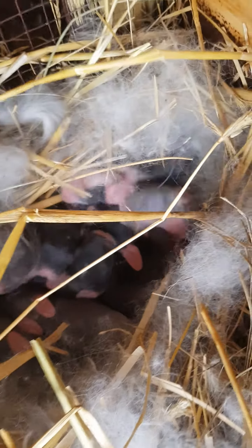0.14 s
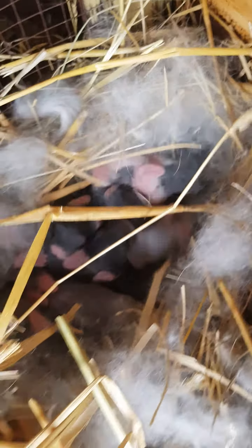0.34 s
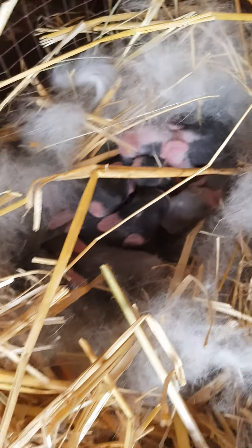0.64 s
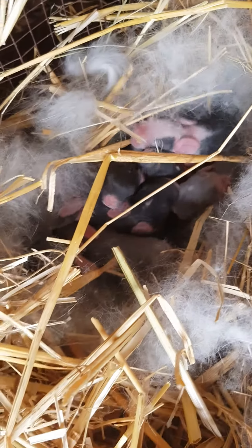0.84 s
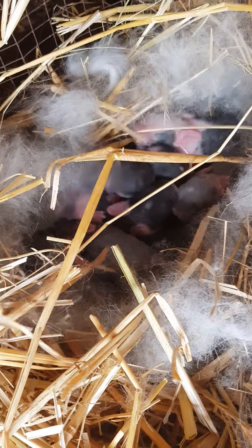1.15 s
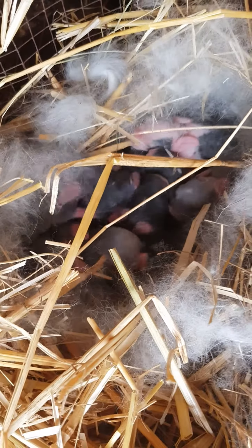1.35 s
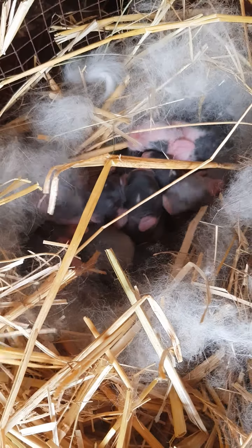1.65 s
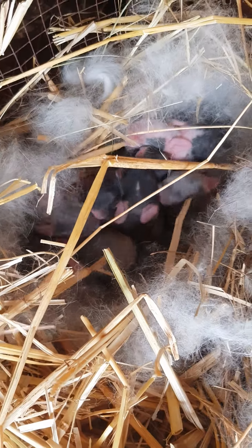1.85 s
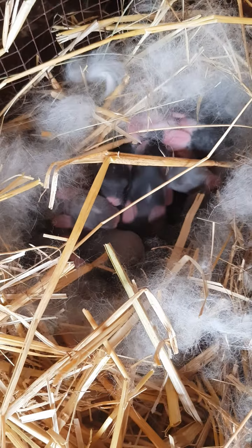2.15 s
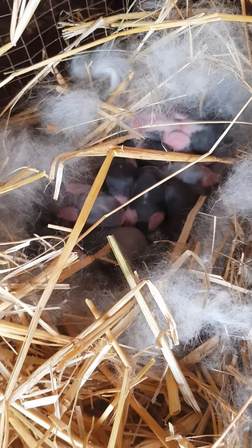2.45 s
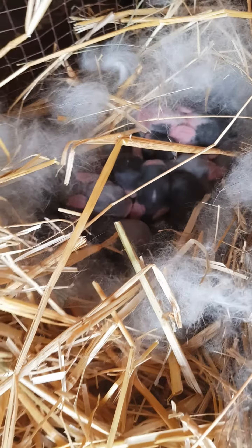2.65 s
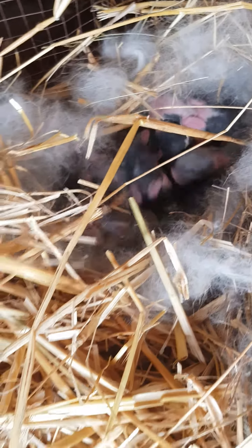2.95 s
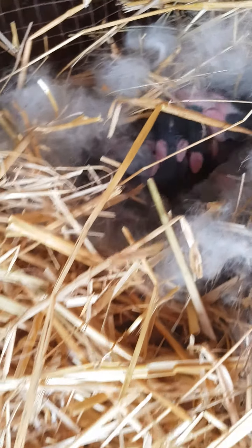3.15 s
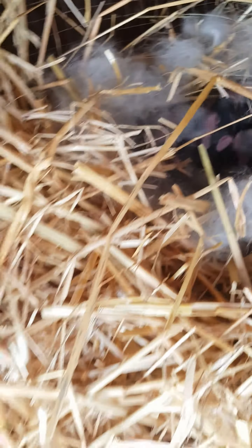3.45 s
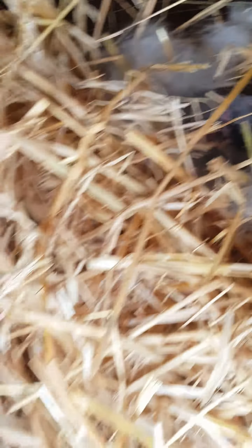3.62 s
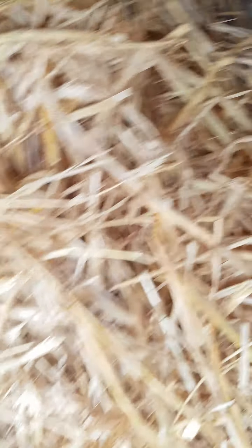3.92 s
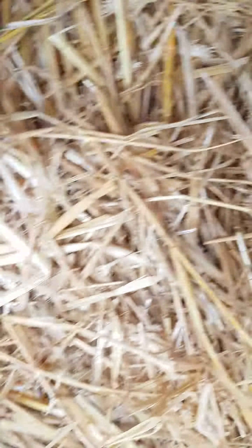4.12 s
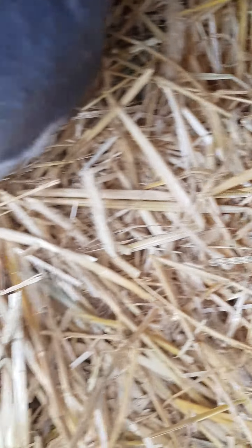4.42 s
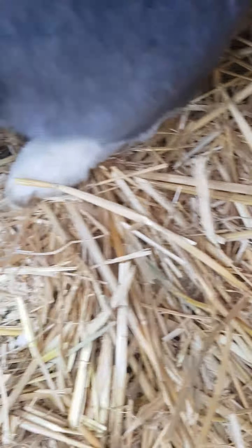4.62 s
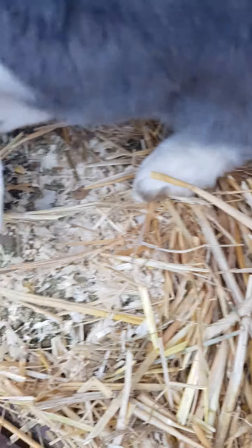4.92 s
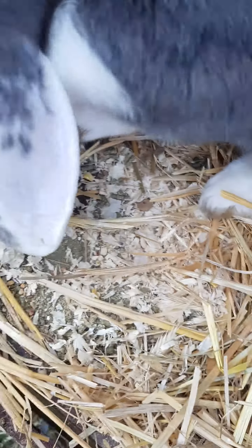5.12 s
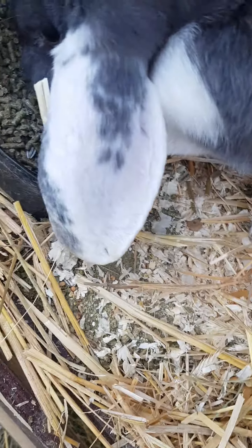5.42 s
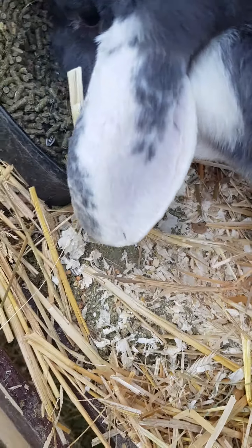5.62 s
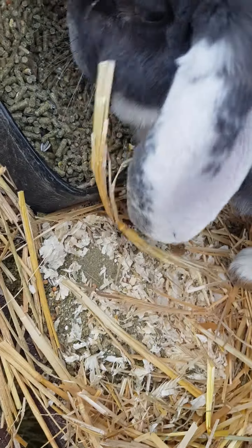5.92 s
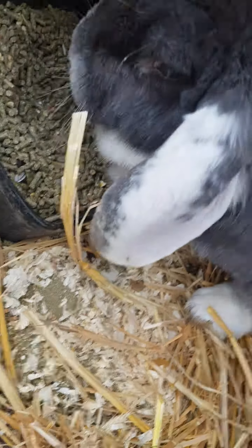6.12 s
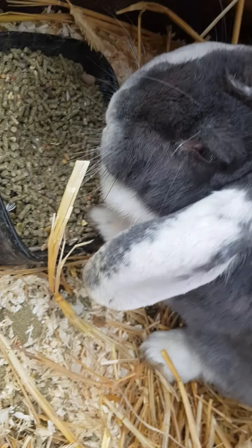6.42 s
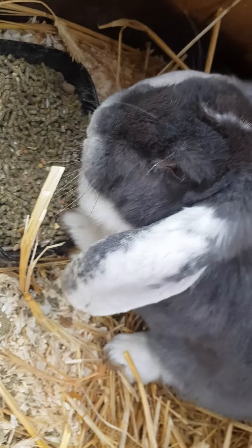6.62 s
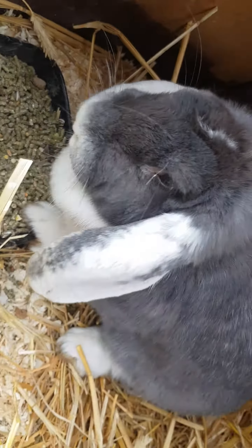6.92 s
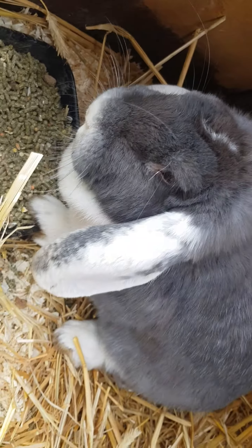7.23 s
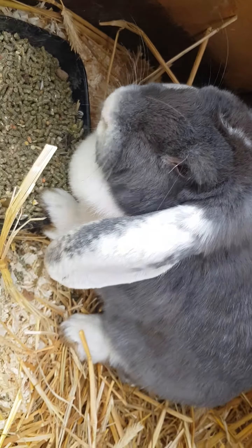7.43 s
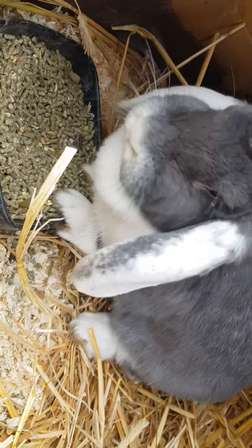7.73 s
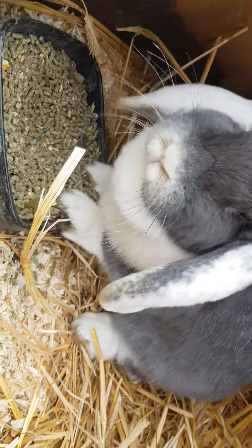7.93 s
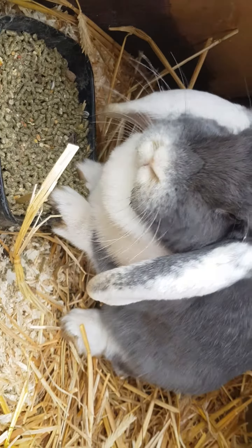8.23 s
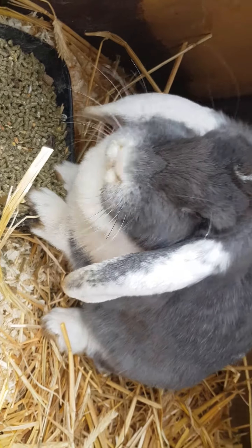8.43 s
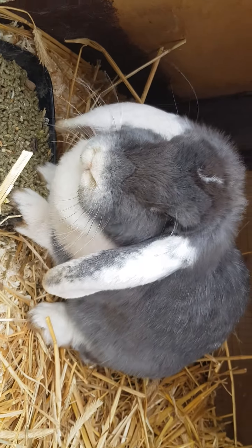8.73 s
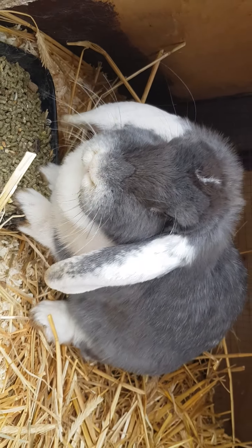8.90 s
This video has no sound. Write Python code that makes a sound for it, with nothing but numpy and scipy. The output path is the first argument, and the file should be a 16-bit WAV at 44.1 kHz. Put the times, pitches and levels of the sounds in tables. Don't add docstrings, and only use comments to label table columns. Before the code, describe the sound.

Outdoors at a rabbit hutch, a farther hen gives three quick chirps, four clucks and a brief thin whine. Dry straw rustles, ticks and snaps close to the microphone, with soft hollow knocks and a wire creak as the stirring peaks. A nearer hen then lets out a long yodelling drawl with a breaking voice and five clucks, leaving faint straw and knocks over low rumble.

```python
import sys
import numpy as np
from scipy import signal
from scipy.fft import rfft, irfft
from scipy.io import wavfile
from scipy.ndimage import uniform_filter1d

SR = 44100
rng = np.random.default_rng(int(sys.argv[2]) if len(sys.argv) > 2 else 0)


def voltage_ratio(level):
    return 10 ** (np.asarray(level, float) / 20)


def digitize_waveform(pressure):
    field = np.atleast_2d(pressure).T
    bounded = np.clip(field, -1, 1)
    quanta = np.round(bounded * 32767).astype(np.int16)
    wavfile.write(sys.argv[1], SR, quanta)


N = 399546

# (time [s], pitch [Hz], first partial [dB], second partial [dB])
DRAWL = [
    (5.25, 511.2, -49.5, -51),
    (5.34, 613, -43.5, -66),
    (5.41, 587, -37.5, -59),
    (5.52, 631, -38, -54.5),
    (5.7, 623, -39, -49),
    (5.905, 626.5, -34.5, -36),
    (6.095, 637.5, -37, -41.5),
    (6.115, 659.4, -35.5, -35),
    (6.352, 676.6, -34, -30),
]
# (start [s], length [s], pitch [Hz], first partial [dB], second partial [dB])
NEAR_CLUCKS = [
    (6.486, 0.21, 645, -37, -34),
    (6.818, .19, 611.7, -37, -34.5),
    (7.144, 0.17, 598, -36.5, -33.5),
]
LATE_CLUCKS = [
    (7.451, 0.17, 592.3, -37, -29),
    (7.772, 0.192, 608, -39.5, -30),
]
FAR_CHIRPS = [
    (0, 0.059, 874, -43.5, -48),
    (.146, 0.071, 651, -41, -53),
    (.268, 0.057, 731, -42.5, -42),
]
FAR_CLUCKS = [
    (.447, 0.15, 622, -44.5, -60.5),
    (.7, .17, 671, -44, -64.5),
    (1.01, 0.174, 662.6, -44, -65.5),
    (1.39, .22, 665, -42.5, -59),
]
# (time [s], pitch [Hz], first partial [dB], second partial [dB])
WHINE = [
    (1.925, 600, -77, -52),
    (1.96, 624.5, -68, -47.5),
    (2.05, 648, -69, -46),
    (2.13, 636, -67, -44),
    (2.205, 598, -50, -47.5),
    (2.23, 582, -52, -39.5),
    (2.285, 562, -57, -48),
]
# (share of length [0-1], pitch [ratio], first partial [dB], second partial [dB],
# half lines against the first partial [dB]); the late one throbs twice and fades
NEAR_SHAPE = [(0, .925, -2.5, -5, -31), (.13, 1.015, 1.5, 0.5, -21), (.38, .985, -2, 0, -20),
              (.7, 1.015, 0.5, 1, -21), (0.999, 1.005, -0.5, 6, -13)]
LATE_SHAPE = [(0, .925, -1.5, -6, -14), (.13, 1.015, 1, -2, -19), (.38, .985, -1.5, -2, -15),
              (.55, 1.001, -1.5, -5.5, -20), (.78, 1.02, 0, 2.5, -13.5), (1, 1.005, -4.5, -7, -25)]
FAR_SHAPE = [(0, .92, -8.5, 8, -6), (.14, 0.99, -4, 7, -11), (.55, 1.01, -0.5, 3.5, -14.5),
             (1, 1.05, -2.5, 9, -11)]
CHIRP_SHAPE = [(0, 1.08, -2, -4.5, -34), (.5, 1.001, -1.5, 0, -19), (1, 1.06, -7, -8, -13)]
# (middle [s], length [s], pitch jump [Hz], level change [dB])
VOICE_BREAKS = [(0.464, 0.061, 20.4, -3.5), (0.704, 0.0075, 137, 1.5), (1.009, 0.02, 160, 0.5),
                (5.373, 0.03, 130, -15), (5.429, 0.022, 107, -13), (5.483, 0.014, 53, 0.5),
                (5.54, 0.028, 116, -10), (5.665, 0.019, 95, 1.5), (5.72, 0.014, 86, 2),
                (5.751, 0.019, 70, -1), (5.786, 0.0195, 75.8, -3), (5.828, 0.031, 105, -1),
                (5.872, 0.044, 92, -1.5), (5.936, 0.022, 94.5, -5), (6.027, 0.0181, 82, 1),
                (6.513, 0.0073, 74, -4), (6.627, 0.0046, 49, 0), (6.927, 0.008, 82, -4),
                (7.801, 0.0095, 56, -6.5)]
# (frequency [Hz], level [dB])
NEAR_THROAT = [(1200, -12), (1880, -12), (2500, -28.5), (3250, -31.5), (3950, -30.5), (4600, -45),
               (5600, -74), (6600, -51.5), (8000, -63)]
DRAWL_THROAT = [(1880, -14), (2500, -27), (3200, -37), (3850, -23), (4450, -30), (5200, -56), (8000, -70)]
FAR_THROAT = [(1200, 21), (1600, -4.5), (2000, -13.5), (2250, -54), (3500, -35), (7000, -38)]
WHINE_THROAT = [(1200, -21), (1600, -20.5), (1900, -22), (2350, -22.5), (3000, -39), (7000, -48)]
# (frequency [Hz], left over right [dB], left phase lead [rad])
NEAR_PLACE = [(600, 0.5, -1), (950, 5.5, -0.9), (1310, -8, -2), (1900, -10.5, 1.5), (3800, 6.5, 1)]
FAR_PLACE = [(600, 0.93, 1.1), (1022, -1.1, -2.5), (1320, 0.89, -1.5), (1900, -2.4, -1), (3800, 0.83, 2)]
# (delay [s], level [dB])
ECHOES = [
    (.011, -58.5),
    (.019, -21),
    (.034, -34.5),
    (.052, -29.5),
]

# (time [s], level [dB])
STRAW = [(0.0, -47), (0.5, -68), (.78, -78.5), (1.26, -65.5), (2.62, -76.5), (2.85, -61.5), (3.73, -53.5),
         (4.0, -59.5), (4.15, -70), (4.35, -61), (5.22, -62.5), (5.7, -50.5), (6.1, -65.5), (6.45, -69),
         (7.95, -61.5), (8.42, -77.5), (8.54, -64.5), (9.06, -66)]
# (start [s], length [s], level [dB], top against the rest [dB])
SWEEPS = [(0.051, 0.094, -50, 0.5), (.815, 0.04, -59, 8), (1.14, 0.24, -65, 5), (1.756, 0.037, -59, 3),
          (3.388, 0.016, -40, -6.5), (3.502, 0.11, -50, -25), (3.622, 0.13, -52, 4.5),
          (3.874, 0.016, -58.5, 21), (5.3, 0.13, -51.5, -1.5), (6.198, 0.17, -58, 1.5),
          (1.34, 0.53, -86, 1), (8.9, .12, -59, -15)]
# (time [s], left over right [dB], top against the rest [dB])
STRAW_SIDE = [
    (0.0, -0.5, 6),
    (1.08, 4, 4.5),
    (2.7, -0.5, 5),
    (4.1, -0.5, 2),
    (5.8, -3.5, -0.5),
    (6.2, -0.5, -6),
    (7.6, -1.5, -7.5),
    (7.87, -14, -4),
    (8.4, -6.5, -2.5),
    (9.06, -2, 0),
]
# (frequency [Hz], level per Hz [dB])
RUSTLE = [(1290, 2), (2200, 0), (2940, -1), (3360, -5.5), (3810, -4), (4110, -4), (6780, -1), (7320, -1.5),
          (9000, -25), (11700, -42), (19800, -120)]
RUSTLE_TOP = [(5000, -3), (8500, -8.5), (9020, -6.5), (11800, 2.5), (15100, -0.5), (15900, 5.5), (16200, 3)]
# (time [s], peak [dB])
THIN_TICKS = [(.6249, -42.5), (.8229, -33.5), (1.1669, -36), (1.22, -31.5), (1.611, -37), (1.764, -29),
              (1.847, -35.5), (1.916, -40), (2.598, -47), (2.9254, -36), (3.037, -29), (3.1841, -34),
              (3.858, -38), (4.97, -41), (5.1504, -58), (8.1904, -41)]
DRY_SNAPS = [
    (1.1503, -45),
    (3.2075, -56),
    (3.5295, -20),
    (3.8767, -22.5),
    (3.8914, -45),
    (5.3507, -25.5),
]
THICK_CRACKS = [
    (3.3888, -36),
    (3.404, -34),
    (3.5842, -30),
    (3.9774, -47),
    (4.6033, -32),
    (7.2558, -45),
    (8.2417, -48.5),
    (8.8903, -38),
]
FULL_CRACKS = [
    (.168, -29.5),
    (2.9631, -34),
    (3.2495, -33),
    (3.656, -22),
    (4.214, -50),
    (5.129, -50),
    (5.982, -43),
    (9.0243, -58),
]
# (time [s], peak [dB], ring [Hz])
KNOCKS = [(0.154, -24, 702), (0.21, -37.5, 976), (0.238, -36, 980), (1.239, -43, 305), (1.399, -42, 662),
          (1.444, -31.5, 328), (1.964, -40, 666), (2.319, -41.5, 650), (2.963, -28.5, 384),
          (3.186, -30, 885), (3.243, -34.5, 720), (3.605, -30, 397), (3.663, -39, 447), (3.76, -36, 558),
          (4.601, -38, 318), (8.29, -43.5, 598), (8.338, -40.5, 590), (8.668, -37, 365), (8.719, -37, 300),
          (8.91, -37.5, 567), (8.969, -35.5, 730)]
# (time [s], pitch [Hz], level [dB])
CREAK = [
    (3.48, 1820, -58),
    (3.516, 1836, -41),
    (3.62, 1800, -47),
]

# (time [s], level over rest [dB])
STIRRING = [(0, 8.5), (.5, -7.5), (2.6, 0), (3.61, 23), (3.95, 4), (5.1, 15), (5.3, 18.5), (5.7, 21),
            (6.33, 19.5), (8.5, 0.5), (9.06, 15)]
# (time [s], level [dB])
BREEZE = [
    (0, -42),
    (2.6, -46),
    (3.61, -34.5),
    (4.0, -45.5),
    (8.5, -45),
    (9.06, -46),
]
# (frequency [Hz], level per Hz [dB])
RUMBLE = [(18, -35.5), (30, -17), (38, 4), (54, 1.5), (92, -2), (108, -9), (125, -15.5), (160, -26),
          (280, -120)]
DRONE = [(68, -32), (115, -9), (152, -3), (173, 1), (196, -1.5), (236, -8), (329, -11), (420, -26.5),
         (550, -30.5), (920, -120)]
SHUFFLE = [(250, -3.5), (350, -6.5), (500, -2), (800, -4.5), (1100, -5.5), (1600, -8)]
TRAFFIC = [(410, -29), (700, -5.5), (871, 5), (1130, 8), (1260, 7), (1470, 3), (1600, 3.5), (2400, -4.5),
           (2960, -22), (4500, -72), (5850, -71), (9900, -120)]
# (frequency [Hz], left-right likeness [-1 to 1])
LIKENESS = [(60, 0.95), (150, 1), (380, 0.66), (950, -0.13), (2380, -0.032), (5980, -0.033),
            (15000, 0.0084)]


def rms_one(x):
    return x / np.sqrt(np.mean(x ** 2) + 1e-20)


def in_time(rows):
    s, *columns = np.transpose(rows)
    return [np.interp(np.arange(N) / SR, s, column) for column in columns]


def at_hz(points, hz, order=1):
    points = np.array(points)
    return np.interp(np.log(hz), np.log(points[:, 0]), points[:, order])


def drift(rate, size=N):
    r = np.exp(-16 * np.pi * rate / SR)
    white = rng.standard_normal(size // 8 + 8002)
    slow = signal.lfilter([1], [1, -2 * r, r * r], white)[8000:]
    return np.interp(np.arange(size) / 8, np.arange(len(slow)), rms_one(slow))


def band(x, low_hz, high_hz):
    return signal.sosfilt(signal.butter(2, [low_hz, high_hz], "band", fs=SR, output="sos"), x)


def sides(pan_db):
    return voltage_ratio(np.array([pan_db / 2, -pan_db / 2]))


def coloured(white, spectrum, patchy_db, rate):
    hz = np.maximum(np.fft.rfftfreq(N, 1 / SR), 1)
    alike = np.clip(at_hz(LIKENESS, hz), -.99, .99)
    mid, side = rfft(white) * voltage_ratio(at_hz(spectrum, hz)) * np.sqrt([1 + alike, 1 - alike])
    pair = np.array([mid + side, mid - side])
    low_hz, high_hz = spectrum[0][0], spectrum[-1][0]
    half_octave = np.log2(hz / low_hz) * 2
    out, together = 0, drift(rate / 4)
    for k in range(int(np.log2(high_hz / low_hz) * 2) + 2):
        share = np.clip(1 - np.abs(half_octave - k), 0, 1)
        flicker = voltage_ratio(patchy_db * (1.86 * together + drift(rate)))
        out = out + flicker * irfft(pair * share, N)
    return out / np.sqrt(np.mean(out.mean(axis=0) ** 2))


def hen(calls, throat, place, jitter, shimmer_db, breath_db, tail_s, first_share, half_lift_db, hoarse_db):
    out, (jump, dip) = np.zeros((2, N)), voice_breaks()
    for rows in calls:
        s, pitch, first_db, second_db, half_db = np.transpose(rows)
        at = np.arange(round(s[0] * SR), round((s[-1] + .04) * SR))
        t = at / SR
        hz = np.interp(t, s, pitch) * (1 + jitter * drift(86, size=len(t))) + jump[at]
        phase = 2 * np.pi * np.cumsum(hz) / SR
        attack = np.clip((t - s[0]) / 0.0024, 0, 1) ** 2
        edge = attack * np.exp(-np.maximum(t - s[-1], 0) / tail_s)
        upper_db = first_share * first_db + (1 - first_share) * second_db
        for k in np.arange(1, 10.5, .5):
            half_line = k % 1 > 0
            curve_db = half_db if half_line else {1: first_db, 2: second_db}.get(k, upper_db)
            level_db = np.interp(t, s, curve_db)
            if k > 2:
                lift_db = half_lift_db if half_line else 0
                level_db = level_db + at_hz(throat, k * hz) + lift_db - 0.065 * jump[at]
            level_db = level_db + dip[at] + shimmer_db * np.sqrt(k) * drift(36, size=len(t))
            breath = drift(400, size=len(t)) + 1j * drift(400, size=len(t))
            rasp = voltage_ratio(min(breath_db + hoarse_db * (k - 1), -1.5)) * breath
            wave = np.exp(1j * (k * phase + rng.uniform(0, 6.2)))
            tone = np.sqrt(2) * voltage_ratio(level_db) * edge * (1 + rasp) * wave
            mean_hz = k * pitch.mean()
            lead = at_hz(place, mean_hz, order=2)
            pair = sides(at_hz(place, mean_hz)) * np.exp(.5j * lead * np.array([1, -1]))
            out[:, at] += np.real(pair[:, None] / np.abs(pair.mean()).clip(.3) * tone)
    return out


def voice_breaks():
    jump, dip = np.zeros(N), np.zeros(N)
    ends = [DRAWL[-1][0]] + [s + length for s, length, *_ in NEAR_CLUCKS + LATE_CLUCKS]
    last_flips = [(end + .003, .02, 85, -4) for end in ends]
    for s, length, jump_hz, dip_db in VOICE_BREAKS + last_flips:
        t = np.arange(max(round((s - .05) * SR), 0), round((s + .05) * SR))
        shape = 1 / (1 + np.exp((np.abs(t / SR - s) - length / 2) / 0.0012))
        jump[t] += jump_hz * shape
        dip[t] += dip_db * shape
    return jump, dip


def shaped(calls, shape):
    return [[(s + share * length, hz * ratio, first_db + a_db, second_db + b_db, first_db + half_db)
             for share, ratio, a_db, b_db, half_db in shape]
            for s, length, hz, first_db, second_db in calls]


def long_call(rows, half_db):
    return [[(*row, row[-1] + half_db) for row in rows]]


def yard(x):
    dull, out = band(x[::-1], 300, 1800), x.copy()
    for delay, db in ECHOES:
        lag = round(delay * SR)
        out[:, lag:] += voltage_ratio(db) * dull[:, :-lag]
    return out


def straw():
    t = np.arange(N) / SR
    edge_s = 0.013
    low_power = top_power = voltage_ratio(in_time(STRAW)[0]) ** 2
    for s, length, db, top_db in SWEEPS:
        rise = np.tanh((t - s) / edge_s * 2)
        fall = np.tanh((t - s - length) / edge_s / 2)
        on = (rise - fall).clip(0) / 2
        low_power = low_power + (voltage_ratio(db) * on) ** 2
        top_power = top_power + (voltage_ratio(db + top_db) * on) ** 2
    cracks_per_s = 500 * voltage_ratio(6.0 * np.tanh(drift(20)))
    crack_size = voltage_ratio(1.96 * np.minimum(rng.exponential(1, N), 2.6))
    cracks = crack_size * (rng.random(N) < cracks_per_s / SR)
    burst = 1 + 0.71 * signal.lfilter([1], [1, -.97], cracks)
    low = coloured(burst * rng.standard_normal((2, N)), RUSTLE, patchy_db=1.5, rate=12.1)
    top = coloured(burst * rng.standard_normal((2, N)), RUSTLE_TOP, patchy_db=-0.26, rate=7.2)
    top_gain = voltage_ratio(in_time(STRAW_SIDE)[1] + 3.0)
    return voltage_ratio(1.5) * np.sqrt(low_power) * low + top_gain * np.sqrt(top_power) * top


def snaps():
    out, t = np.zeros((2, N)), np.arange(2000) / SR
    decay = np.exp(-t / 0.0028) + 0.31 * np.exp(-t / 0.023)
    # (snaps, low part [dB], top part [dB])
    kinds = [(THIN_TICKS, -11, 7.1), (DRY_SNAPS, -12, -11), (THICK_CRACKS, -5, -14), (FULL_CRACKS, -1.9, 5.4)]
    for table, low_db, top_db in kinds:
        for s, peak_db in table:
            puff = rng.standard_normal((2, len(t))) * decay
            puff = 0.45 * puff + 0.23 * puff[0]
            snap = band(puff, 3740, 9600)
            snap = snap + voltage_ratio(low_db + 8.5) * band(puff, 1000, 4600)
            snap = snap + voltage_ratio(top_db - 6.0) * band(puff, 9200, 15000)
            i = round(s * SR)
            out[:, i:i + len(t)] += (voltage_ratio(peak_db - 2.0) * snap)[:, :N - i]
    return out


def knocks():
    out, t = np.zeros((2, N)), np.arange(5000) / SR
    for s, peak_db, hz in KNOCKS:
        push = rng.standard_normal((2, len(t))) * (t / .012) * np.exp(-t / 0.015)
        push = push + push[0]
        ring = band(push, hz * 0.867, hz * 1.074)
        body = ring + 0.38 * band(band(push, 344, 800), 340, 890)
        i = round((s - .006) * SR)
        out[:, i:i + len(t)] += (voltage_ratio(peak_db - 3.0) * body / np.abs(body).max())[:, :N - i]
    return out


def creak():
    hz, level_db = in_time(CREAK)
    t = np.arange(N) / SR
    on = uniform_filter1d(1. * (t > CREAK[0][0]) * (t < CREAK[-1][0]), size=600)
    phase = 2 * np.pi * np.cumsum(hz) / SR
    rough = np.array([drift(70) * np.sin(phase), drift(70) * np.cos(phase)])
    return voltage_ratio(level_db + 1.0) * on * rough


def outdoors():
    (stir_db,), (rumble_db,) = in_time(STIRRING), in_time(BREEZE)
    swing_db = 0.37 * (rumble_db - rumble_db.mean())
    rise_db = 0.5862 * np.arange(N) / SR
    drone_db = -53 + 0.25 * stir_db + swing_db + rise_db
    noise = rng.standard_normal((4, 2, N))
    rumble = voltage_ratio(rumble_db) * coloured(noise[0], RUMBLE, patchy_db=1.5, rate=1.3) * sides(2.0)[:, None]
    drone = voltage_ratio(drone_db) * coloured(noise[3], DRONE, patchy_db=1.62, rate=4.1) * sides(1.8)[:, None]
    shuffle = coloured(noise[1], SHUFFLE, patchy_db=1.6, rate=46) * sides(3.1)[:, None]
    traffic = voltage_ratio(-58) * coloured(noise[2], TRAFFIC, patchy_db=1.1, rate=24)
    return rumble + drone + voltage_ratio(stir_db - 72.5) * shuffle + traffic


def scene():
    near_rough = dict(jitter=.0045, breath_db=-26, hoarse_db=3.7, shimmer_db=1.1)
    drawl = hen(long_call(DRAWL, half_db=-21), DRAWL_THROAT, NEAR_PLACE,
                tail_s=0.0073, first_share=0.61, half_lift_db=1.5, **near_rough)
    near_calls = shaped(NEAR_CLUCKS, NEAR_SHAPE) + shaped(LATE_CLUCKS, LATE_SHAPE)
    near = hen(near_calls, NEAR_THROAT, NEAR_PLACE,
               tail_s=0.0023, first_share=0.57, half_lift_db=10, **near_rough)
    far_calls = shaped(FAR_CHIRPS, CHIRP_SHAPE) + shaped(FAR_CLUCKS, FAR_SHAPE)
    far = hen(far_calls, FAR_THROAT, FAR_PLACE, jitter=.005, shimmer_db=2.1, breath_db=-21,
              tail_s=0.0084, first_share=0.11, half_lift_db=1.5, hoarse_db=9)
    whine = hen(long_call(WHINE, half_db=-15), WHINE_THROAT, FAR_PLACE, jitter=0.0025, shimmer_db=1.1,
                breath_db=-22, tail_s=0.0042, first_share=0.34, half_lift_db=14.5, hoarse_db=4.0)
    stalks = (straw() + snaps()) * sides(in_time(STRAW_SIDE)[0])
    return yard(far + whine + drawl + near) + stalks + knocks() + creak() + outdoors()


def roll_off(x):
    return signal.sosfilt(signal.butter(12, 16050, fs=SR, output="sos"), x)


def record(dry):
    no_bass = signal.sosfilt(signal.butter(6, 38, "high", fs=SR, output="sos"), dry)
    top_cut = signal.cheby2(12, 60, 16100 * 1.03, fs=SR, output="sos")
    return roll_off(signal.sosfilt(top_cut, no_bass))


dry = scene()
out = record(dry)
digitize_waveform(out)
```